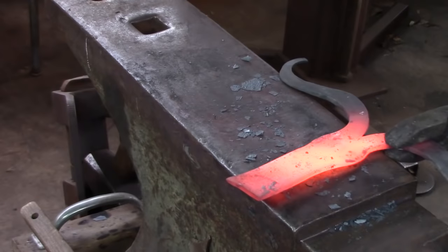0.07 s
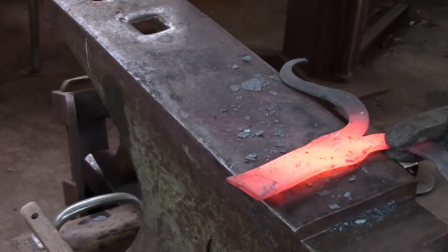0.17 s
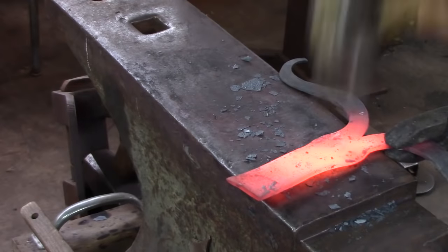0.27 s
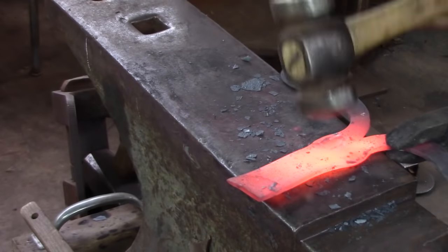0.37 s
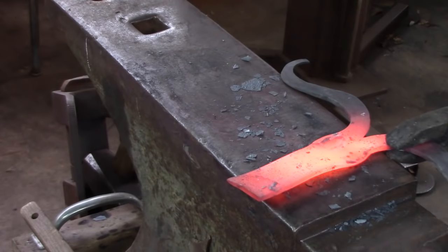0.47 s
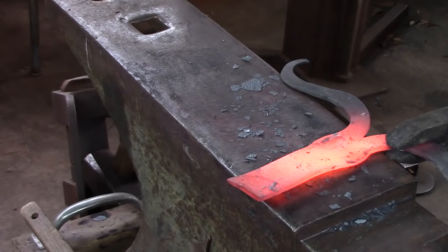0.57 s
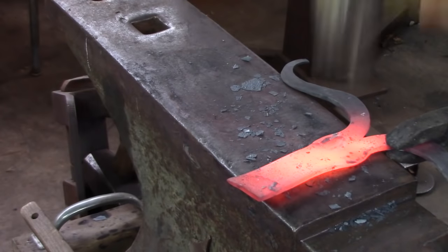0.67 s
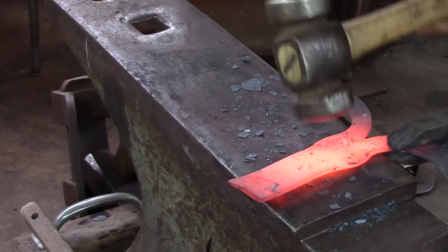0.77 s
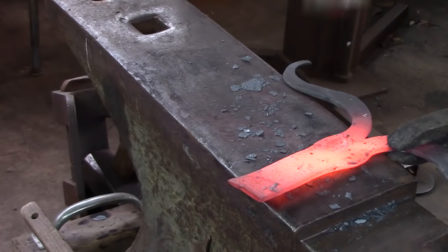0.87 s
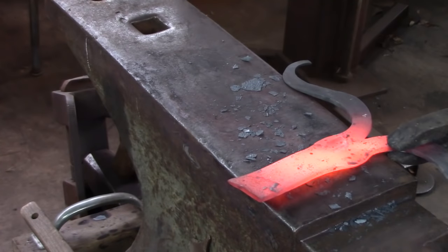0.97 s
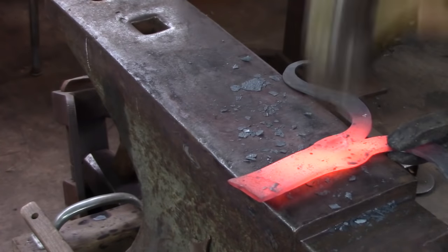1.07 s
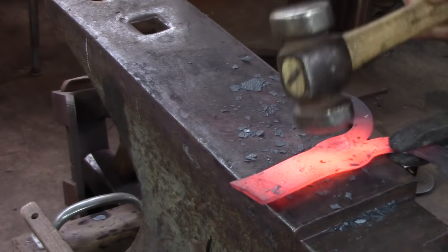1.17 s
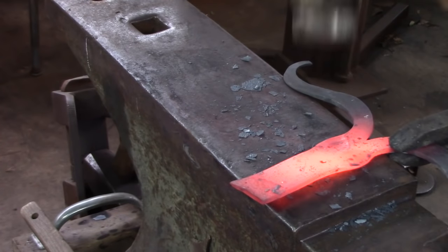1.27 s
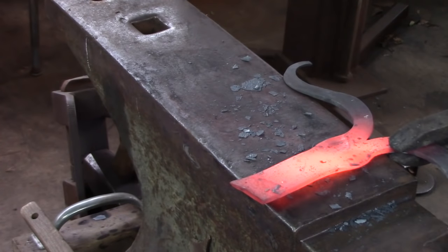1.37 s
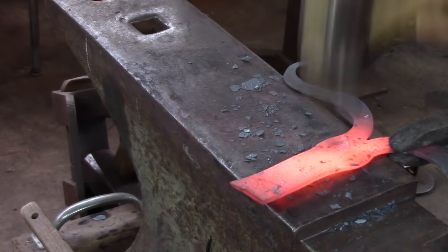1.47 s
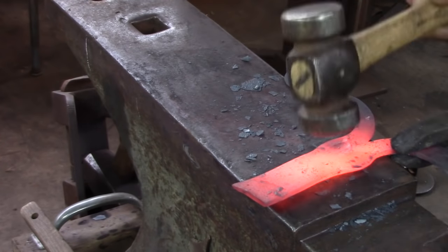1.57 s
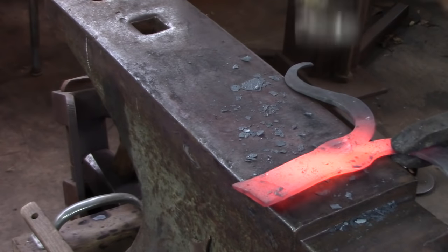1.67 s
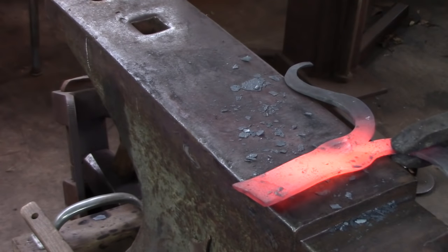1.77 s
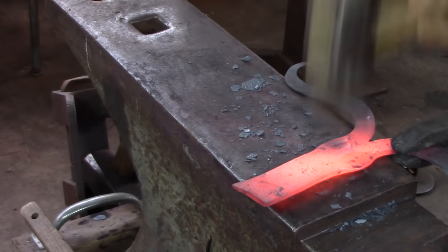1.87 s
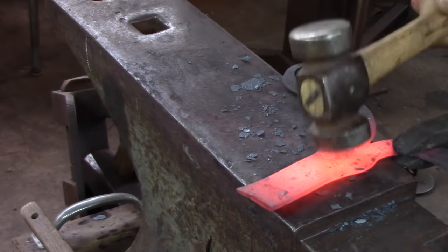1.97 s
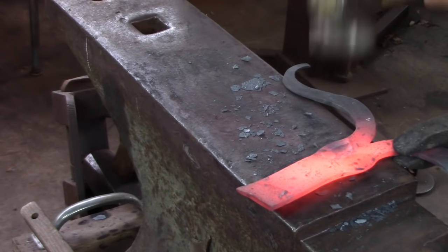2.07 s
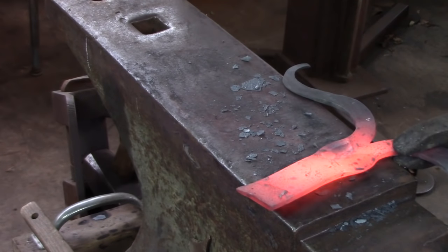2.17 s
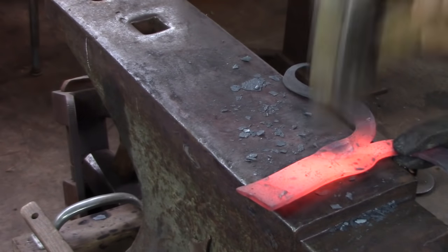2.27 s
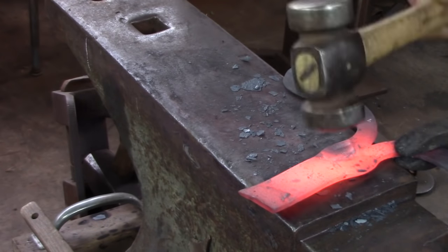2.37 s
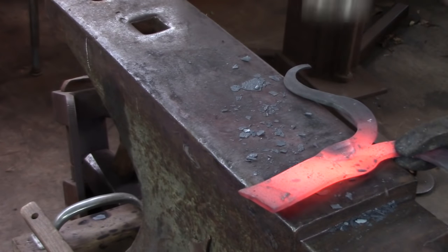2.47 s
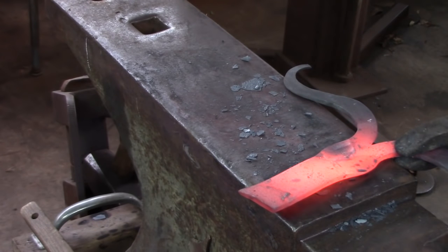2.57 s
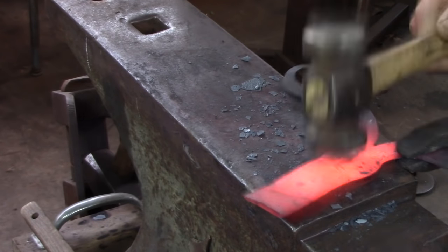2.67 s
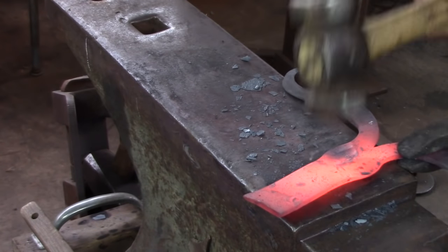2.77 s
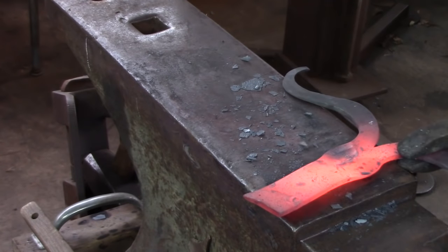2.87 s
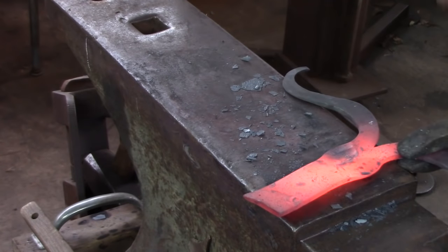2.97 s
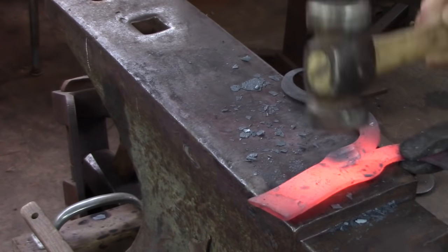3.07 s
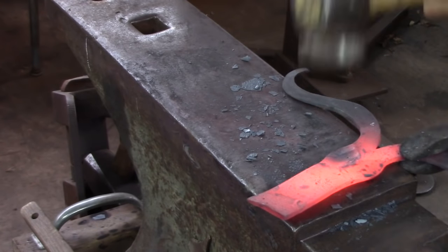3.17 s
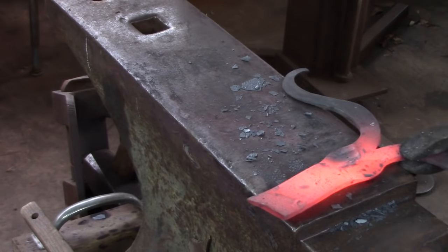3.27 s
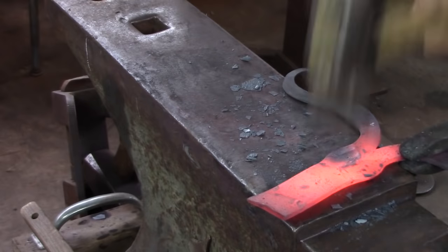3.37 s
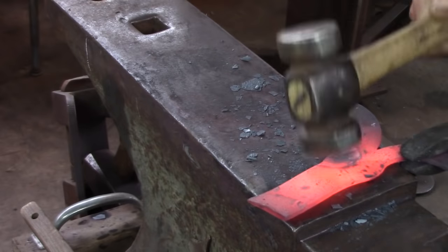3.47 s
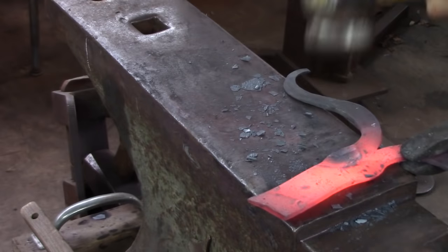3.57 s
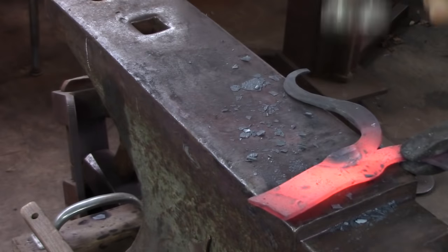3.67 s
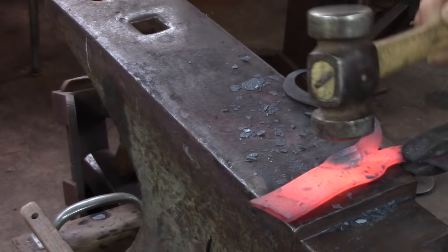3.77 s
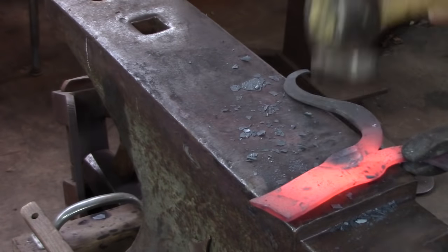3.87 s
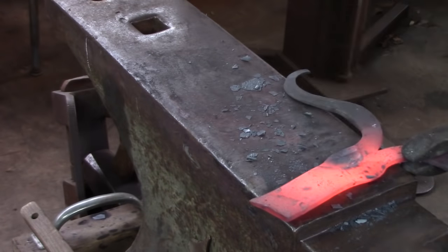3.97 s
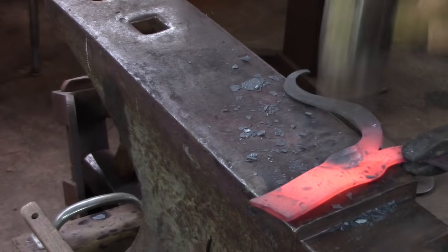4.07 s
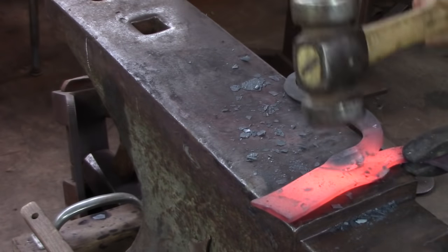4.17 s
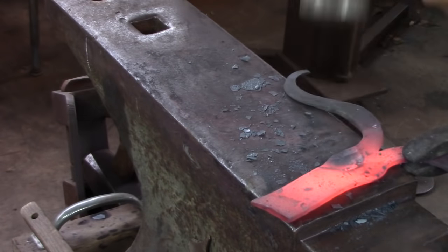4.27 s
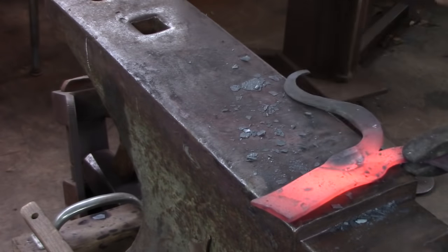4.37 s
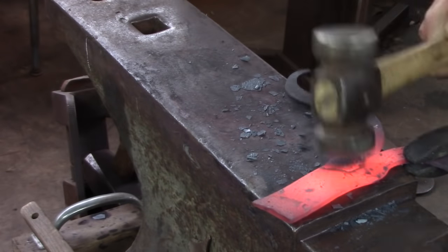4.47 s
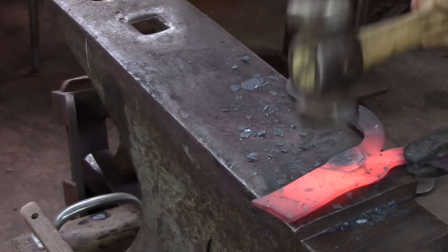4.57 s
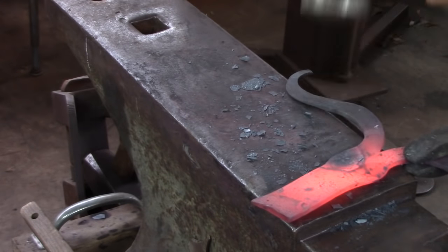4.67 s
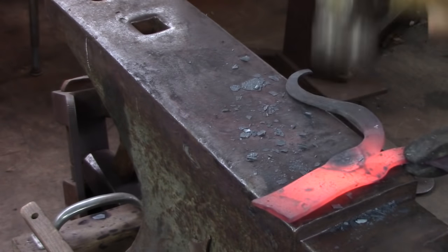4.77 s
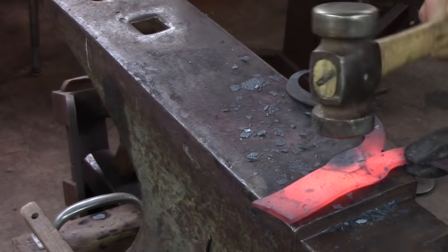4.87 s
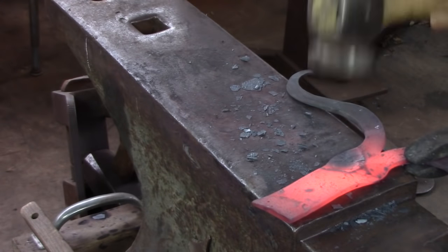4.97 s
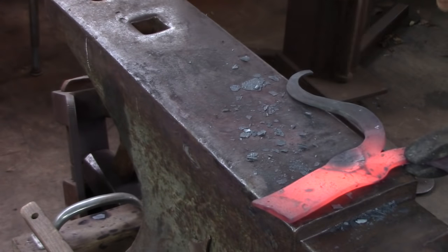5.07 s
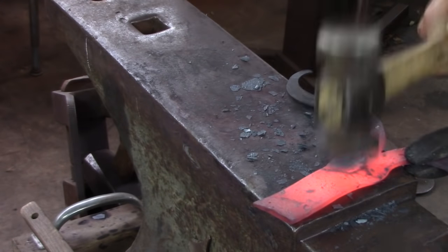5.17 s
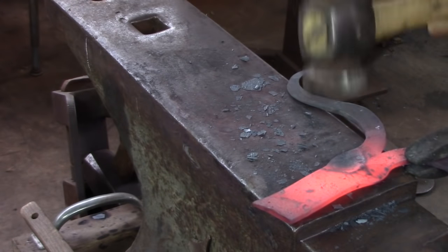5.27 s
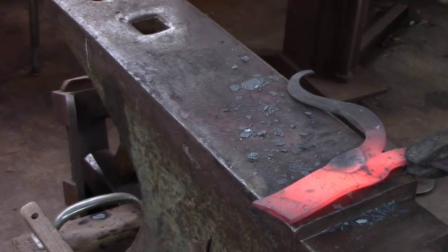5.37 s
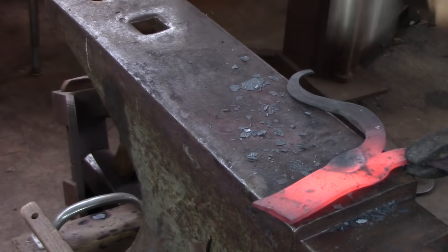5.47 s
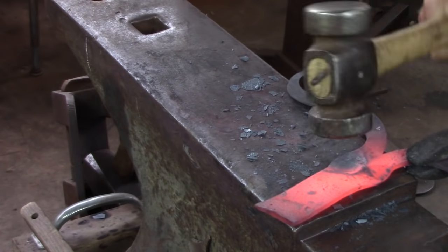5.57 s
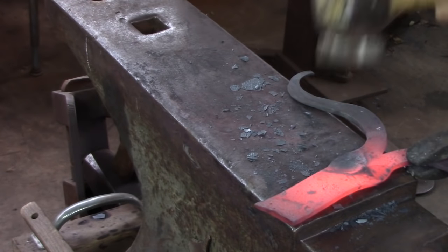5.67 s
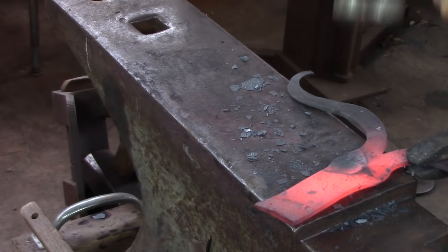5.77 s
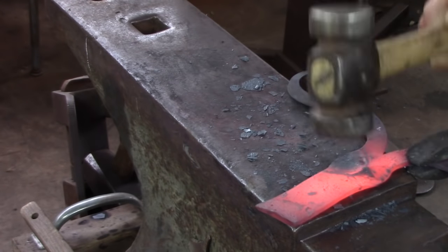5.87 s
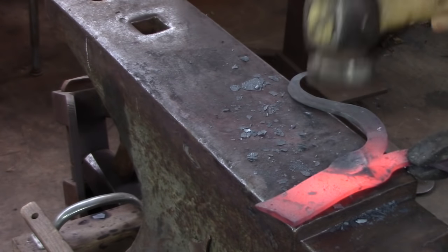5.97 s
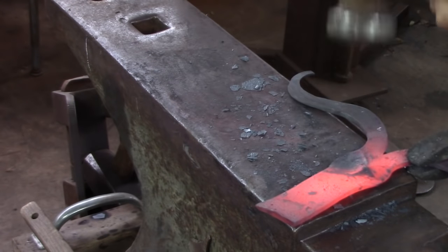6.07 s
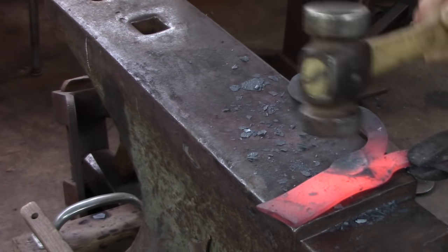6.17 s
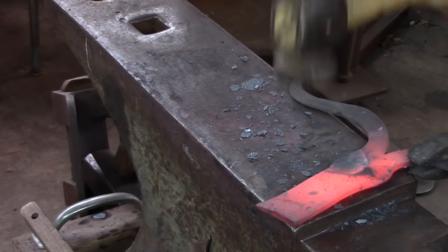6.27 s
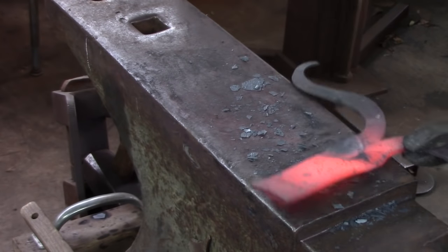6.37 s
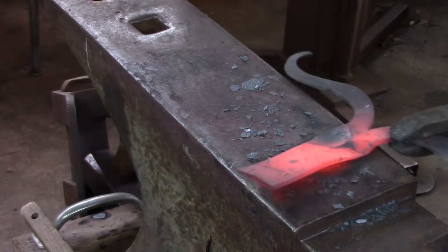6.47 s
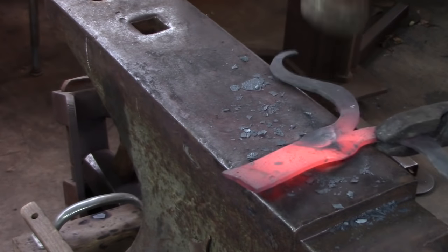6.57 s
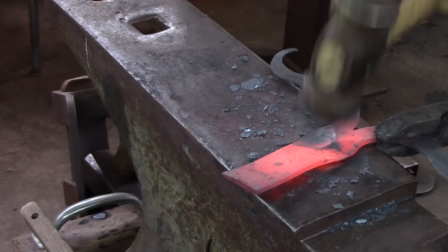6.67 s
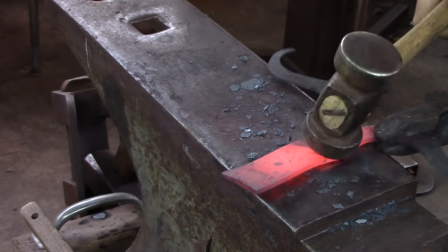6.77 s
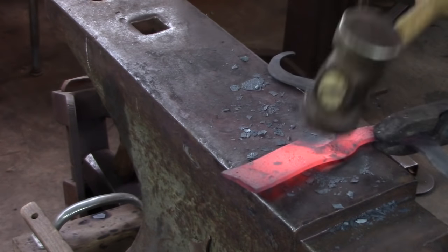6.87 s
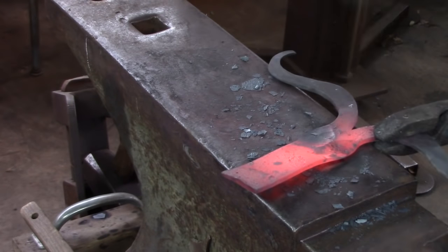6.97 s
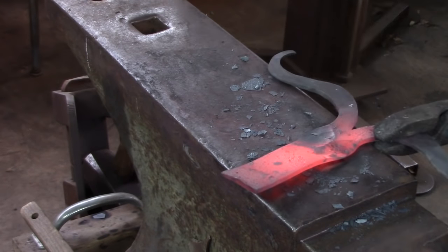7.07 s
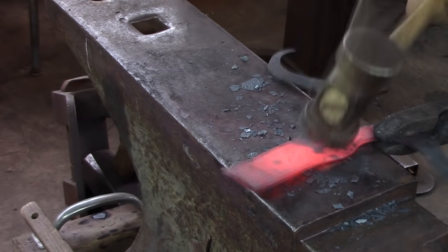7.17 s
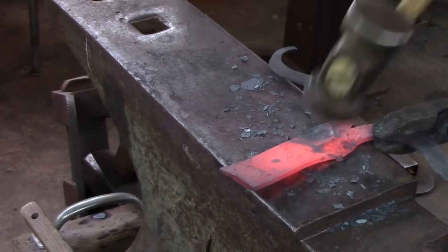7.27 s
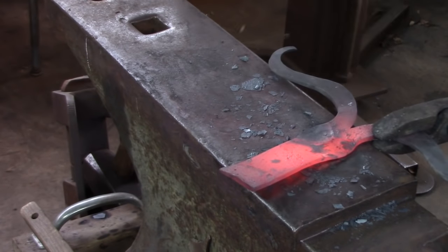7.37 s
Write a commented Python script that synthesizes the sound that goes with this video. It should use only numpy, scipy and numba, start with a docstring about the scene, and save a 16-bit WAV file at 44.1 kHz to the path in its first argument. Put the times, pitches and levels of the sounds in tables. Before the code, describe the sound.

A hand hammer strikes hot steel on a ringing anvil at a quick steady beat, then the bar scrapes, clacks down and takes one more blow.

```python
"""Smith forging at an anvil

A hand hammer strikes a glowing bar in a small workshop, over steady air. Each blow sums dying sines for anvil,
hammer head and stand with a clatter of decaying noise bands. Near the end the bar slides and is set down:
gritty noise, dull clacks, cracking scale, a clink and a creak of the tongs, then one more blow.
The recorder overloads on each blow, ducks, then recovers, so the hammer's ring swells up out of the clang."""
import sys
import numpy as np
from scipy import signal
from scipy.io import wavfile
from scipy.ndimage import uniform_filter1d
from numba import njit

SR = 44100
rng = np.random.default_rng(int(sys.argv[2]) if len(sys.argv) > 2 else 0)


def to_wav(sig):
    """Store sig (one row per channel, or 1-D mono) as 16-bit WAV at the path in sys.argv[1].

    Samples outside -1..1 are clipped; the rate is SR.
    """
    pcm = np.clip(np.atleast_2d(sig), -1, 1) * 32767
    pcm = np.round(pcm).astype(np.int16)
    wavfile.write(sys.argv[1], SR, pcm.T)  # frames by channels


N = 327663

AGE = np.arange(SR) / SR   # seconds since a contact, over one second
EDGES_HZ = np.geomspace(70, 16500, 25)
CENTRES_HZ = np.sqrt(EDGES_HZ[1:] * EDGES_HZ[:-1])
BANK = [signal.butter(2, band, "band", fs=SR, output="sos") for band in zip(EDGES_HZ, EDGES_HZ[1:])]

# modes of the hammer head: pitch_hz
HAMMER_HZ = [5523.4, 11119.3, 15014, 15439]
# the same modes: base_level_db, t60_s, family, level_change_on_bar_db (fades out as the head bounces clear)
HAMMER_MODES = [(-28, 0.68, "bending", -4.5), (-25, 0.54, "length", -9.5), (-42, 0.66, "poll", -8),
                (-43.5, .6, "poll", -5)]
# colour of scale and iron in contact: frequency_hz, relative_level_db_per_hz
GRIT_SPECTRUM = [(200, -10), (600, 10), (2000, 11), (3500, 11), (5000, 6.5), (8000, 4.5), (12000, 3),
                 (15500, -12)]


def from_db(db):
    """Decibels to gain."""
    return 10 ** (np.asarray(db) / 20)


def rms_one(x):
    """Scale to rms 1."""
    return x / np.sqrt(np.mean(x ** 2) + 1e-20)


def dying(t60):
    """Envelope that falls 60 dB in t60 seconds."""
    return np.exp(-np.log(1000) * AGE / t60)


def at_hz(points, hz):
    """Read a table on a log-frequency axis."""
    table_hz, values = np.array(points).T
    return np.interp(np.log(hz), np.log(table_hz), values)


def add(out, start_s, sound):
    """Mix a sound in from start_s on; one that starts before zero leaves only its tail."""
    at = round(start_s * SR)
    part = sound[max(-at, 0):N - at]
    out[max(at, 0):max(at, 0) + len(part)] += part


def noise_bands(spectrum, size):
    """Third-octave bands of noise that sum to the spectrum, rms 1; neighbours use separate noises."""
    white = rng.standard_normal((2, size))
    gains = from_db(at_hz(spectrum, CENTRES_HZ))
    bands = np.array([gain * signal.sosfilt(sos, white[k % 2])
                      for k, (sos, gain) in enumerate(zip(BANK, gains))])
    return bands / bands.sum(0).std()


def resonance(x, hz, width_hz):
    """Two-pole band-pass with gain 1 at its centre."""
    r = np.exp(-np.pi * width_hz / SR)
    feedforward = np.array([1, 0, -1]) * (1 - r * r) / 2
    feedback = [1, -2 * r * np.cos(2 * np.pi * hz / SR), r * r]
    return signal.lfilter(feedforward, feedback, x + 1e-18)


def mode(hz, t60, waver, late_db=-120, late_t60=0.84, waver_hz=70, build_s=0.16):
    """A dying sine; reflections building up from the walls make it waver in level and phase, and linger faintly."""
    knots = rng.standard_normal((2, 200))
    in_phase, across = [np.interp(AGE * waver_hz, np.arange(len(k)), k) for k in knots]
    turn = 2 * np.pi * hz * AGE
    direct = dying(t60) * np.sin(turn)
    # build_s is the time in which the part still missing from the reflections falls 60 dB
    reflected_level = (waver * dying(t60) + from_db(late_db) * dying(late_t60)) * (1 - dying(build_s))
    reflected = reflected_level * (in_phase * np.sin(turn) + across * np.cos(turn))
    return rng.choice([-1, 1]) * (direct + reflected)


def shop_decay(crack_db, crack_t60, late_db, late_t60):
    """Envelope per band: the direct crack, the near walls, then a faint late tail from the far end."""
    # decay from the near walls: frequency_hz, t60_s
    near_t60 = [(100, 0.17), (300, 0.76), (700, 0.44), (1600, 0.29), (3500, 0.25), (7000, 0.25),
                (15000, 0.22)]
    crack = from_db(crack_db) * dying(crack_t60)
    near = np.array([dying(t60) for t60 in at_hz(near_t60, CENTRES_HZ)])
    far = from_db(late_db) * dying(late_t60) / (1 + (CENTRES_HZ[:, None] / 3000) ** 2)
    return np.sqrt(crack ** 2 + near ** 2 + far ** 2)


def clack(hz, width_hz, ring_db, damped_t60):
    """A dead contact: a burst of grit through the shop's decay, coloured by one broad ring."""
    decay = shop_decay(crack_db=14.0, crack_t60=0.0091, late_db=-14.5, late_t60=0.71)
    burst = (noise_bands(GRIT_SPECTRUM, SR) * decay).sum(0) * dying(damped_t60)
    return burst + from_db(ring_db) * resonance(burst, hz, width_hz)


def shop_air(level_db=-73):
    """Steady air of the shop, as shaped noise."""
    # colour of the air: frequency_hz, relative_level_db_per_hz
    spectrum = [(30, -29), (100, -14), (250, -3), (700, 6), (1500, 0.5), (3000, -8), (6000, -12.5),
                (11500, -19.5), (14000, -27.5)]
    return from_db(level_db) * noise_bands(spectrum, N).sum(0)


def dragging(grain_db=4):
    """Flakes of scale crunch under the sliding bar: gritty noise with quick random steps in level."""
    # the bar dragged over the anvil's scale: time_s, level_db
    drag = [(6.36, -86), (6.43, -62), (6.47, -62), (6.53, -69.5), (6.62, -62), (6.68, -77), (6.72, -95)]
    steps_db = grain_db * np.repeat(rng.standard_normal(N // 64 + 1), 64)[:N]
    grains = uniform_filter1d(from_db(steps_db), size=16)   # soften the steps
    crunch = rms_one(noise_bands(GRIT_SPECTRUM, N).sum(0) * grains)
    level_db = np.interp(np.arange(N) / SR, *np.transpose(drag), left=-200, right=-200)
    return from_db(level_db) * crunch


def creak(ring_db=-69, ring_t60=0.041, tick_db=-58):
    """The tongs creak as they grip: the jaws stick and slip in a quick uneven run of ticks."""
    # the grip: start_s, end_s, mean_slips_per_s, pitch_hz
    grip = (7.058, 7.15, 135, 3200)
    start, end, per_s, hz = grip
    slips = start + (np.cumsum(rng.uniform(.8, 1.2, size=40)) - 1) / per_s
    out = np.zeros(N)
    for s in slips[slips < end]:
        rub = dying(.005) * rng.standard_normal(SR)
        tick = resonance(rub, hz=6380, width_hz=400) + resonance(rub, hz=hz, width_hz=1500)
        ring = mode(hz, ring_t60, waver=.3)
        add(out, s, from_db(ring_db) * ring + from_db(tick_db) * tick)
    return out


def clink():
    """The tongs touch the anvil's edge once: one short clear dying note."""
    # the touch: start_s, pitch_hz, level_db, t60_s
    touch = (6.612, 1726, -48, 0.14)
    s, hz, db, t60 = touch
    out = np.zeros(N)
    add(out, s, from_db(db) * mode(hz, t60, waver=0.88))
    return out


def scale_flakes():
    """Flakes of scale crack with a high tick, a clack with a broad bright ring."""
    # cracks: start_s, level_db
    flakes = [(.18, -80), (6.628, -70), (6.817, -62), (6.832, -76)]
    out = np.zeros(N)
    for s, db in flakes:
        add(out, s, from_db(db) * clack(hz=10500, width_hz=7300, ring_db=10.5, damped_t60=0.15))
    return out


def bar_landings(thud_db=-8.5):
    """Soft hot iron lands with a dead clack and thuds into the stand, whose low modes die quickly."""
    # the bar set down on the anvil: start_s, level_db, ring_hz
    landings = [(6.613, -64.5, 1470), (6.769, -39.5, 6300), (6.819, -52, 1930)]
    # dull knock of the bar landing flat: pitch_hz, level_within_thud_db, t60_s
    thud_modes = [(197, -12, 0.17), (225, -8.5, 0.13), (268, -4, 0.24), (341, -2, 0.26), (1710, 4, 0.2),
                  (3500, -8, 0.34)]
    out = np.zeros(N)
    for s, db, ring_hz in landings:
        contact = clack(ring_hz, width_hz=1060, ring_db=9.5, damped_t60=0.94)
        thud = sum(from_db(thud_db + mode_db) * mode(mode_hz, t60, waver=0.61)
                   for mode_hz, mode_db, t60 in thud_modes)
        add(out, s, from_db(db) * (contact + thud))
    return out


def hammer_nudge():
    """The hammer nudges the bar into place and its lowest listed mode sings faintly."""
    # the nudge: start_s, level_db
    nudge = (6.769, -61)
    s, db = nudge
    t60 = HAMMER_MODES[0][1]
    out = np.zeros(N)
    add(out, s, from_db(db) * mode(HAMMER_HZ[0], t60, waver=.03))
    return out


def hammering(clatter_db=-17, alike=0.4, rebound_s=0.14):
    """Every blow rings anvil, hammer and stand; the clatter is partly the same each time, as the room is."""
    # blows of much the same force: start_s, reach (-1 over the waist to 1 out on the overhang),
    # squareness (-1 glancing to 1 flat), level_change_of_hammer_bending_db
    blows = [(-0.4, 0.23, -0.26, -1), (0.3575, 0.12, -0.65, 5), (0.7627, 0.38, -0.52, 9),
             (1.1554, 0.37, -1.07, 5.5), (1.5561, 0.29, -0.6, 7), (1.9556, -0.75, -0.45, -1),
             (2.3542, 0.075, 0.44, 1), (2.7371, -0.4, 0.091, 5), (3.1123, 0.083, .43, -6.5),
             (3.4599, -0.84, -0.98, 3.5), (3.8022, -0.32, 0.26, .5), (4.1648, 0.14, 0.5, -3),
             (4.5184, 0.54, -0.042, 7), (4.8681, 0.13, 0.4, -2), (5.2242, 0.29, 0.34, 0),
             (5.573, -0.046, 0.076, -6.5), (5.8954, -0.14, 0.053, 1), (6.1921, 0.23, 0.2, 4.5),
             (7.2306, 0.046, -0.39, 1.5)]
    # anvil modes: pitch_hz, base_level_db, t60_s, family
    anvil_modes = [(1458, -39, 0.45, "heel"), (1473, -27.5, 0.24, "face"), (2880, -17, 0.22, "horn"),
                   (3461, -19.5, 0.22, "face"), (3541, -13, 0.19, "face"), (3565, -20.5, 0.26, "edge"),
                   (3648, -25, 0.12, "edge"), (3916, -20.5, 0.27, "heel"), (4707, -28.5, 0.23, "face"),
                   (5659, -21, .23, "edge"), (6364, -27, 0.25, "heel"), (6575, -27, 0.23, "edge"),
                   (6963, -22.5, 0.19, "face"), (7033, -22.5, 0.18, "edge"), (7140, -33, 0.24, "edge"),
                   (7620, -36.5, 0.22, "face"), (8590, -36, 0.2, "horn"), (8970, -35, 0.22, "face"),
                   (9600, -39.5, 0.23, "edge"), (10600, -45.5, 0.21, "heel"), (11610, -30.5, 0.2, "edge"),
                   (11480, -37, 0.25, "horn"), (12425, -42, 0.24, "edge"), (12929, -43, 0.2, "face"),
                   (13640, -41, 0.22, "edge"), (14400, -45, 0.24, "face"), (14200, -47.5, .3, "heel")]
    # low resonances of the anvil stand: pitch_hz, base_level_db, t60_s
    stand_modes = [(278.3, -43.5, 0.4), (336, -49.5, 0.38), (480.6, -52.5, 0.58)]
    # knock of hammer, bar and loose anvil fittings: frequency_hz, relative_level_db_per_hz
    clatter_spectrum = [(100, -27), (200, -27.5), (280, -22.5), (400, -25), (550, -9), (900, -6.5),
                        (1600, 7), (2500, 4), (3400, 5.5), (4800, -4.5), (7000, -4.5), (8500, -10.5),
                        (12000, -8), (15500, -26)]
    # how a blow wakes each family of modes: level_change_db, db_per_unit_reach, db_per_unit_squareness
    waking = {"horn": (-0.4, 15, 0), "heel": (-2.6, 9.9, 1), "face": (0, .8, 4.9), "edge": (-0.99, 2, 7.6),
              "length": (-0.46, -2.3, 14.3), "poll": (2.2, 0, 8.8)}

    out = np.zeros(N)
    decay = shop_decay(crack_db=-1.5, crack_t60=0.022, late_db=-31.5, late_t60=1.0)
    usual = (noise_bands(clatter_spectrum, SR) * decay).sum(0)
    on_bar = np.clip(1 - AGE / rebound_s, 0, 1)   # 1 at contact, 0 once the hammer is clear
    for s, reach, squareness, bending_db in blows:
        woken_db = {family: db + per_reach * reach + per_square * squareness
                    for family, (db, per_reach, per_square) in waking.items()}
        woken_db["bending"] = bending_db
        knock_db = -1.5 + 2 * reach   # the anvil rocks more on its stand when struck far out

        own = (noise_bands(clatter_spectrum, SR) * decay).sum(0)
        clatter = np.sqrt(alike) * usual + np.sqrt(1 - alike) * own
        stand = sum(from_db(db + knock_db) * mode(hz, t60, waver=0.55) for hz, db, t60 in stand_modes)
        anvil = sum(from_db(db + woken_db[family])
                    * mode(hz, t60, waver=0.7, late_db=-43, late_t60=0.74, waver_hz=85.2)
                    for hz, db, t60, family in anvil_modes)
        hammer = sum(from_db(db + woken_db[family] + shaded_db * on_bar) * mode(hz, t60, waver=0.07)
                     for hz, (db, t60, family, shaded_db) in zip(HAMMER_HZ, HAMMER_MODES))
        add(out, s, from_db(clatter_db + knock_db) * clatter + stand + anvil + hammer)
    return out


def scene():
    """Everything at the anvil, over the steady air of the shop."""
    bar_handling = dragging() + bar_landings() + scale_flakes() + hammer_nudge()
    tongs = creak() + clink()
    return (shop_air() + bar_handling + tongs + hammering())[None]


@njit
def follow(excess, attack, release):
    """Gain reduction in dB: closes in on the excess level, lets go by a fixed step per sample."""
    out, held = np.zeros(len(excess)), 0.
    for i in range(len(excess)):
        if excess[i] > held:
            held += attack * (excess[i] - held)
        else:
            held = max(held - release, 0.)
        out[i] = held
    return out


def gain_control(x, limit_db=-32.0, sense_s=0.00032, attack_s=0.0028, release_db_per_s=230):
    """Loud sound is pulled toward the limit within milliseconds, and the gain climbs back as it fades."""
    r = np.exp(-1 / (sense_s * SR))
    power = signal.lfilter([1 - r], [1, -r], x * x)
    level_db = 10 * np.log10(power + 1e-14)
    reduction_db = follow(level_db - limit_db, 1 / (attack_s * SR), release_db_per_s / SR)
    return x * from_db(-reduction_db)


def record(dry, top=0.089):
    """Gain control; the first milliseconds overload before it acts; bass and top are cut."""
    x = gain_control(dry[0])
    x = x / (1 + (x / top) ** 6) ** (1 / 6)   # rounds peaks off toward +-top
    x = signal.sosfilt(signal.butter(1, 70, "high", fs=SR, output="sos"), x)
    # steep low-pass: 60 dB down from 16700 Hz
    return signal.sosfilt(signal.cheby2(16, 60, 16700, fs=SR, output="sos"), x)[None]


dry = scene()
out = record(dry)
to_wav(out)
```